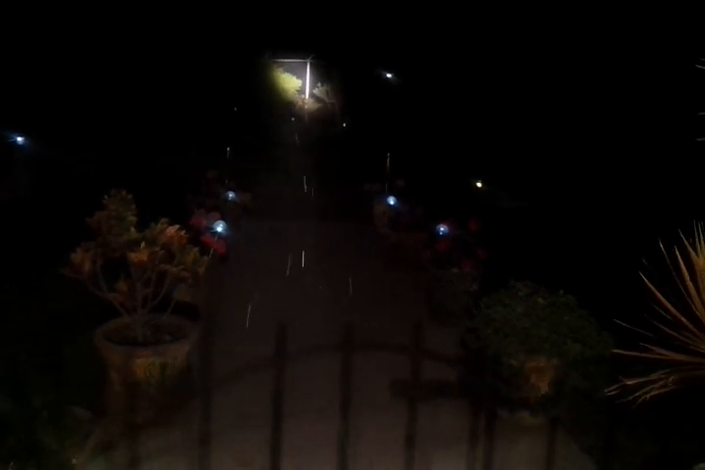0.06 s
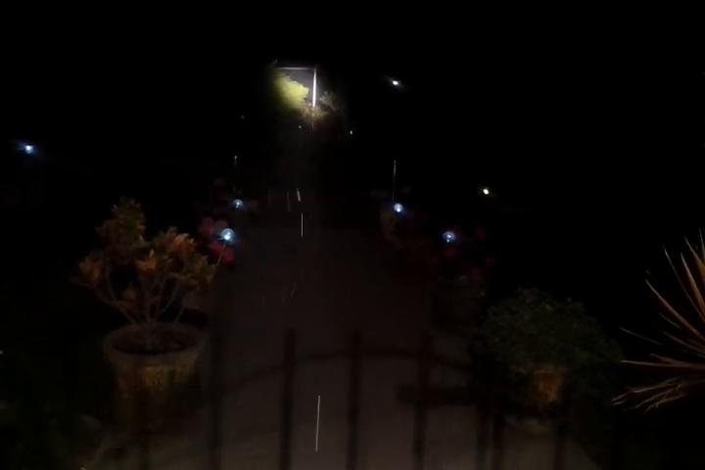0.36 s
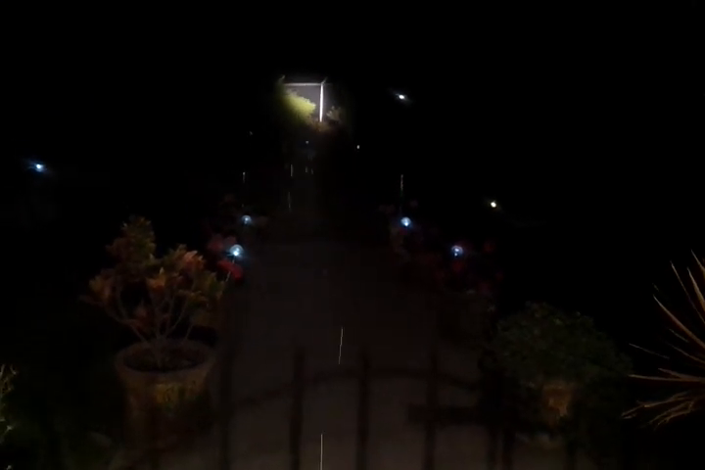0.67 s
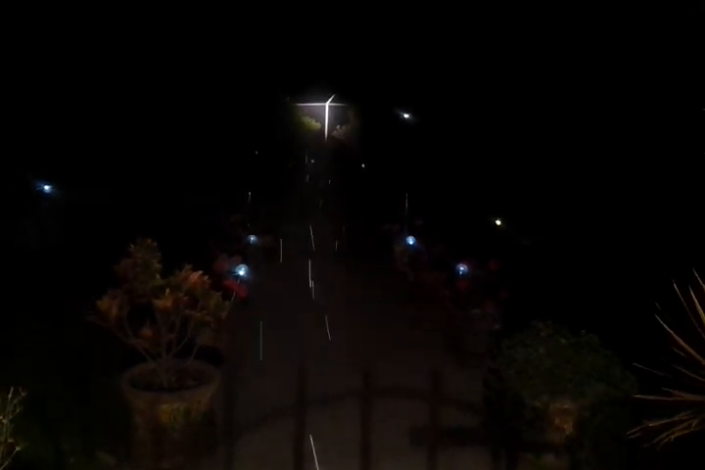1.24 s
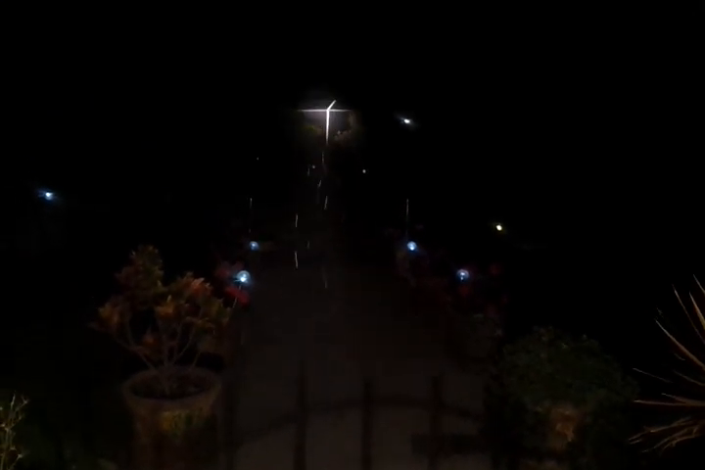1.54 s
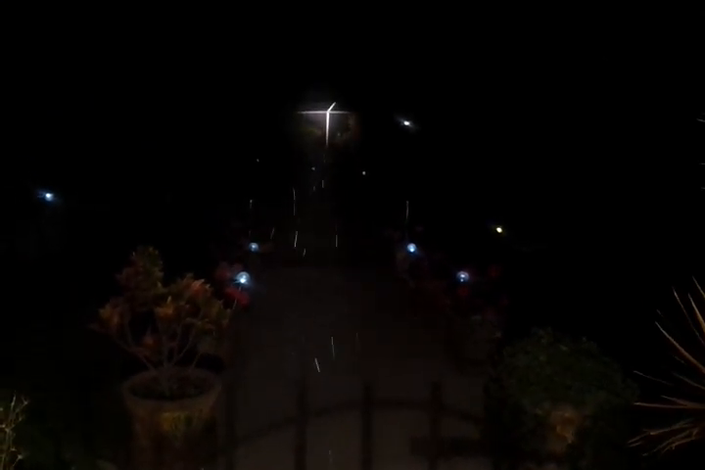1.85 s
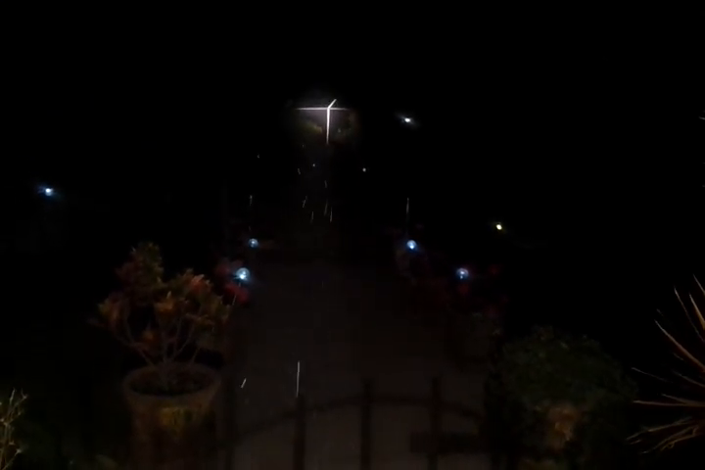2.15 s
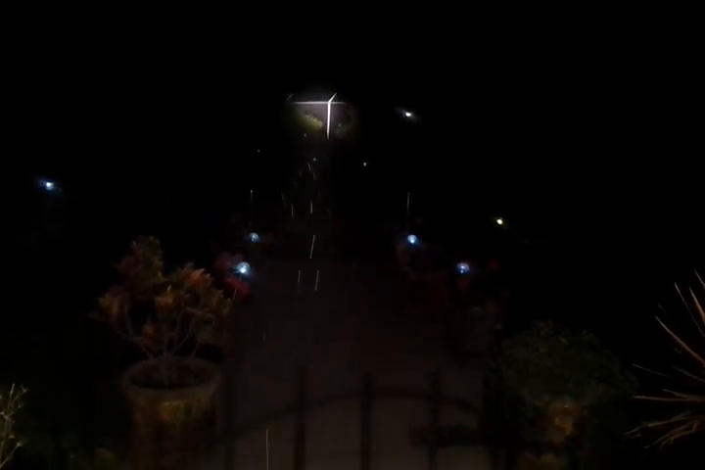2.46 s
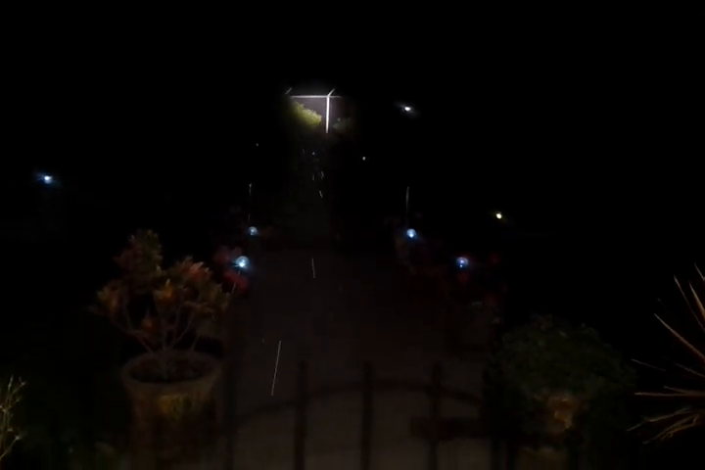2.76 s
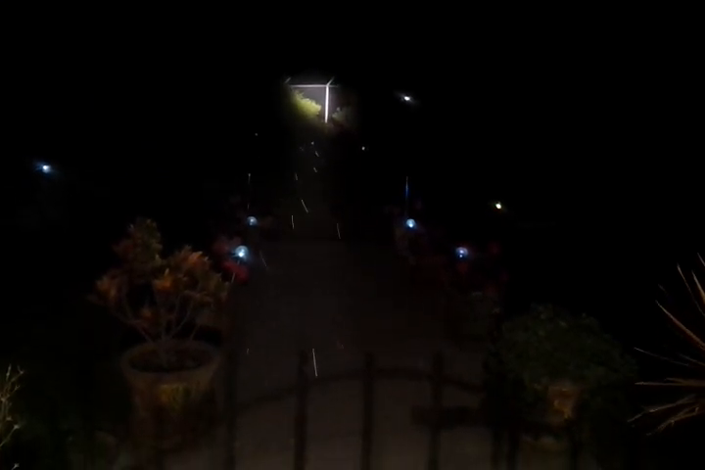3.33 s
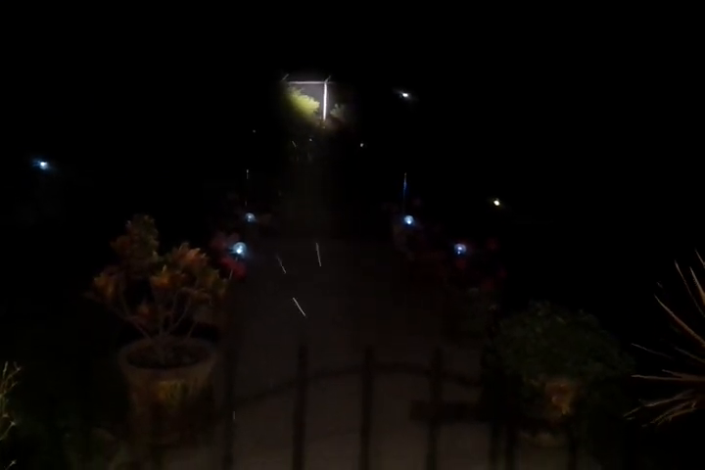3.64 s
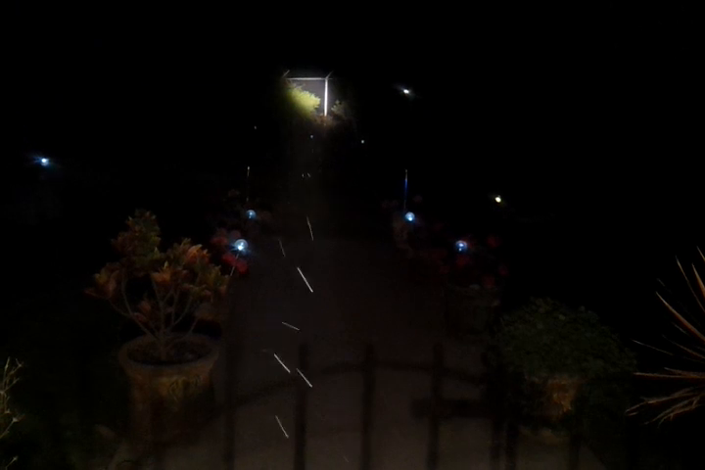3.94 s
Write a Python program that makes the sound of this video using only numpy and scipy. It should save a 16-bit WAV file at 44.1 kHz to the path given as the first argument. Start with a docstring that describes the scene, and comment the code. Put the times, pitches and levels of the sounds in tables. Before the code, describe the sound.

A cricket chirps quietly and regularly outdoors at night, while handling rumble, soft bumps and brief brushes sound close on the microphone. Light drizzle and a far town hum continue behind, with distant traffic rising faintly near the end.

```python
"""Cricket in a drizzly night garden

A cricket chirps by stridulation, its wing strokes smeared by the garden's echoes. A hand on the
camera that holds the microphone makes a low rumble, soft thumps and a few brushing rustles.
Far traffic swells once with a faint whine, over fine drizzle, steady hiss and the hum of a town."""
import sys
import numpy as np
from scipy import signal
from scipy.fft import rfft, irfft, next_fast_len
from scipy.io import wavfile
from scipy.ndimage import map_coordinates

SR = 44100
rng = np.random.default_rng(int(sys.argv[2]) if len(sys.argv) > 2 else 0)


def store_wav(level_fs):
    """Save 16-bit WAV to argv[1]."""
    pcm = np.round(np.clip(np.atleast_2d(level_fs), -1, 1) * 32767)
    wavfile.write(sys.argv[1], SR, pcm.T.astype(np.int16))


N = 176400


def amp(db):
    """Amplitude ratio of a level in decibels."""
    return 10 ** (np.asarray(db) / 20)


def unit(x):
    """Normalisation to rms 1."""
    return x / np.sqrt(np.mean(x ** 2) + 1e-20)


def curve(rows):
    """Linear interpolation of (time [s], value) points at every sample."""
    return np.interp(np.arange(N) / SR, *np.transpose(rows))


def wobble(rate):
    """Smooth fluctuation: a spline through `rate` random values a second."""
    return map_coordinates(rng.standard_normal(int(N * rate / SR) + 4), [np.arange(N) * rate / SR])


def filtered(x, response):
    """Linear filtering: the spectrum of x is multiplied by a frequency response."""
    size = next_fast_len(N + SR // 2)
    return irfft(rfft(x, size) * response(np.fft.rfftfreq(size, 1 / SR)), size)[:N]


def noise(response):
    """White noise shaped by a frequency response, at rms 1."""
    return unit(filtered(rng.standard_normal(N), response))


def coloured(points):
    """Broadband noise of rms 1 whose spectrum follows (frequency [Hz], relative level [dB]) points."""
    hz, db = np.transpose(points)
    return noise(lambda f: amp(np.interp(np.log(f + 1), np.log(hz + 1), db)))


def narrow(hz, width):
    """Narrow-band noise of rms 1, heard as a fuzzy tone."""
    return noise(lambda f: 1 / (1 + ((f - hz) / width * 2) ** 2))


def add(out, start_s, x):
    """Superposition of x on out from a starting time."""
    i = max(round(start_s * SR), 0)
    out[i:i + len(x)] += x[:max(N - i, 0)]


def cricket():
    """Stridulation: each wing stroke is a falling tone, made raspy by the file's unevenly caught teeth."""
    # (time [s], level [dB], starting pitch [Hz], wing strokes [count], fall within a stroke [Hz])
    chirps = [(0.268, -61.5, 3990, 4, 280), (0.842, -60.5, 4024, 5, 190), (1.538, -62, 3990, 4, 332),
              (2.075, -61.5, 4015, 4, 280), (2.746, -60.3, 4025, 4, 320), (3.420, -61.5, 3967, 4, 300)]
    period_s, stroke_s, tooth_hold_s = 0.030, 0.023, 0.00201
    rise_hz, scatter_hz = 14, 52
    loudest_share, taper_db = 0.28, 1.4  # a chirp peaks at this share of its strokes
    garden_t60_s, echo_db = 0.32, 2
    t = np.arange(int(stroke_s * SR)) / SR
    progress = t / stroke_s
    echo_t = np.arange(SR // 3) / SR
    echo_decay = amp(-60 * echo_t / garden_t60_s)
    out = np.zeros(N)
    for start, db, hz, strokes, fall_hz in chirps:
        for k in range(int(round(strokes))):
            rasp = map_coordinates(rng.standard_normal(32), [t / tooth_hold_s])
            pitch = hz + rise_hz * (k - 1) - fall_hz * progress ** 2 + scatter_hz * (rasp - rasp.mean())
            envelope = np.abs(np.sin(np.pi * progress)) ** 0.5
            stroke = envelope * np.sin(2 * np.pi * np.cumsum(pitch) / SR)
            heard = signal.fftconvolve(stroke, rng.standard_normal(len(echo_t)) * echo_decay)
            heard *= amp(echo_db) * np.linalg.norm(stroke) / np.linalg.norm(heard)
            heard[:len(t)] += stroke  # the direct sound joins its reverberation
            heard *= np.sqrt(period_s * SR) / np.linalg.norm(heard)  # energy of one period at rms 1
            stroke_db = db - taper_db * (k - loudest_share * strokes) ** 2
            add(out, start + k * period_s, amp(stroke_db) * heard)
    return out


def grip_rumble():
    """Structure-borne sound: the hand's uneven grip reaches the microphone as low noise."""
    # strength of the rumble (time [s], level [dB])
    grip = [(0, -42), (0.3, -42), (0.48, -42.5), (0.56, -47.5), (0.95, -46.5), (1.12, -49), (1.28, -53),
            (1.39, -54), (1.47, -48), (1.69, -45.5), (1.77, -53), (2.12, -45.5), (2.27, -51), (2.42, -46),
            (2.68, -54.5), (3.05, -47), (3.35, -49.5), (3.7, -52), (4, -58)]
    # its spectrum (frequency [Hz], relative level [dB])
    spectrum = [(8, -33), (20, 7.5), (36, 6), (55, 3.5), (82, -1), (120, -9.5), (190, -23), (260, -24.5),
                (500, -51), (1500, -91)]
    uneven_db = 2 * wobble(18)
    return amp(curve(grip)) * unit(amp(uneven_db) * coloured(spectrum))


def case_thumps():
    """Soft impact: the hand pushes the case once and lets it spring back, giving a two-lobed pulse. The first
    pulse, at the very start, is a brief click of the same shape rather than a push of the hand."""
    # (time [s], peak level [dB], pitch [Hz]); the first row is a brief click at the very start
    thumps = [(0.017, -38, 102), (0.105, -33, 58), (0.174, -40, 62), (0.202, -35, 66), (0.282, -34, 67),
              (0.35, -38, 62), (0.398, -39, 62), (0.471, -31, 54.5), (0.658, -30, 51.4),
              (0.862, -39.5, 71.6), (0.994, -38.5, 61), (1.078, -42, 53.5), (1.396, -41.5, 42),
              (1.51, -34.5, 77), (1.531, -36, 61), (1.59, -43, 82.4), (1.644, -32, 44.3),
              (1.665, -33, 44.7), (1.719, -42.5, 50), (1.78, -43.5, 215), (2.115, -39, 61.4),
              (2.16, -45, 85), (2.374, -40, 45.5), (2.428, -42, 58.6), (2.497, -40.5, 71), (3.031, -36, 43),
              (3.09, -42.5, 62), (3.255, -41.5, 55), (3.309, -36, 53), (3.328, -33, 51), (3.512, -32, 59.6),
              (3.581, -42.5, 80.4), (3.608, -35.5, 73.4), (3.659, -30.5, 78), (3.82, -45, 88)]
    softness = 3.47
    t, out = np.arange(N) / SR, np.zeros(N)
    for centre, db, hz in thumps:
        scaled_time = np.pi * hz * (t - centre)
        push = -scaled_time / (1 + scaled_time ** 2) ** softness
        out += amp(db) * push / np.abs(push).max()
    return out


def rustles():
    """Friction noise: each light brush is a grainy swell coloured by the same few resonances."""
    # (time [s], level [dB]) aside, a brush is a band of noise; its columns are
    # (centre time [s], half length [s], level [dB], centre [Hz], width [octaves], resonance depth [ratio])
    brushes = [(0.09, 0.034, -67, 6500, .12, .8), (0.156, 0.022, -62, 3650, 0.2, .2),
               (0.438, 0.02, -66, 3000, .15, 1), (0.462, 0.024, -61, 5500, 0.19, 1.9),
               (0.948, 0.027, -62, 3800, .6, .6), (2.087, 0.02, -58, 6700, 0.36, 1.2),
               (2.172, 0.019, -51, 7350, 0.51, 1.1), (2.229, 0.037, -61.5, 7000, 0.27, 1),
               (3.572, 0.027, -59, 6750, 0.32, 0.8), (3.603, 0.078, -60.5, 2800, 1, .5)]
    # (frequency [Hz], width [Hz], gain at depth 1 [dB])
    resonances = [(3030, 670, 7), (5440, 440, 3.5), (6780, 540, 6), (7300, 420, 5), (8550, 300, 1.5),
                  (9680, 490, 4.5)]
    grain_db, grains_per_s = 2.5, 220

    def body(f):
        return amp(sum(db / (1 + (2 * (f - hz) / width) ** 2) for hz, width, db in resonances))

    t, out = np.arange(N) / SR, np.zeros(N)
    for centre, half, db, hz, octaves, depth in brushes:
        rolloff = lambda f: np.sqrt(1 + np.abs(np.log2((f + 1) / hz) / octaves) ** 3)
        friction = noise(lambda f: body(f) ** depth / rolloff(f))
        grain = amp(grain_db * np.tanh(wobble(grains_per_s)))
        swell = np.exp(-0.5 * ((t - centre) / half) ** 2)
        out += amp(db) * swell * unit(friction * grain)
    return out


def traffic():
    """Rolling noise: far tyres roar in one swell; their main whine and an engine drone vary separately."""
    # swell of the roar (time [s], level [dB])
    roar_level = [(0, -90), (1.2, -79), (2.0, -76), (2.35, -66.5), (2.75, -62.8), (3.05, -64), (3.29, -67),
                  (3.45, -75), (4, -76)]
    # spectrum of the tyres (frequency [Hz], relative level [dB])
    tyres = [(250, -37), (450, -5), (560, 6), (700, 5), (745, 0), (800, 7), (950, 7), (1150, -1.5),
             (1600, -7.5), (3000, -53)]
    # weaker whines within the roar (frequency [Hz], width [Hz], relative level [dB])
    weak_whines = [(697, 25, -5), (503, 22, -11)]
    # main tyre whine (time [s], level [dB])
    whine_level = [(0, -78), (1.0, -77), (1.8, -73.5), (2.3, -74), (2.75, -64), (3.05, -71), (3.27, -64.5),
                   (3.38, -75), (4, -74)]
    # engine drone (time [s], level [dB])
    drone_level = [(0, -82), (0.9, -75.5), (1.25, -70), (1.75, -70), (2.1, -75.5), (4, -85)]
    roar = coloured(tyres) + sum(amp(db) * narrow(hz, width) for hz, width, db in weak_whines)
    whine = amp(curve(whine_level)) * narrow(hz=870.6, width=25)
    drone = amp(curve(drone_level)) * narrow(hz=294, width=32)
    return amp(curve(roar_level)) * roar + whine + drone


def drizzle():
    """Shot noise: droplets land at random times, each ticking as a damped sinusoid."""
    drops_per_s, level_db, centre_hz, ring_cycles = 300, -74.5, 4950, 3.4
    draws = rng.random((int(drops_per_s * N / SR), 3))
    arrival, pitch, size = np.hsplit(draws, 3)
    t = np.arange(SR // 200) / SR
    hz = centre_hz * 2 ** (2 * pitch - 1)  # up to an octave either side
    strength = -np.log(1 - size)  # exponentially distributed
    ticks = strength * np.sin(2 * np.pi * hz * t) * np.exp(-2 * hz * t / ring_cycles)
    places = (arrival * N).astype(int) + np.arange(len(t))
    return amp(level_db) * unit(np.bincount(places.ravel(), ticks.ravel(), N)[:N])


def hiss():
    """Broadband noise: drizzle and the microphone's self-noise merge into a nearly steady hiss."""
    # (time [s], level [dB])
    level = [(0, -58), (0.8, -58), (1.2, -59), (2.0, -58), (2.8, -58.5), (3.3, -58.5), (4, -58.5)]
    # (frequency [Hz], relative level [dB])
    spectrum = [(200, -0.5), (900, 1), (1600, -1.6), (2500, 0.2), (3500, -0.1), (5000, -0.2), (6700, 0.14),
                (8500, -1.5), (11700, -3)]
    return amp(curve(level)) * coloured(spectrum)


def town_hum():
    """Ambient noise: the far town is a hum with little treble, wavering slightly in level."""
    # (frequency [Hz], relative level [dB])
    spectrum = [(60, -1.5), (200, -0.5), (300, 0.5), (390, -1), (570, 1.5), (780, -1), (950, -1.5),
                (1400, -6), (2200, -9.5), (4000, -39)]
    level_db = -61.5 + 0.6 * wobble(4.69)
    return amp(level_db) * coloured(spectrum)


def wash():
    """Amplitude-modulated noise: a faint upper-middle band fades early and returns near the end."""
    # (time [s], level [dB])
    level = [(0, -66.5), (1, -84.5), (3.3, -71.5), (3.6, -66.5), (4, -66.5)]
    # (frequency [Hz], relative level [dB])
    spectrum = [(600, -38), (1100, 1), (1600, 1.5), (2300, -4.5), (3200, -6), (6000, -31)]
    return amp(curve(level)) * coloured(spectrum)


def scene():
    """Superposition: all sources sum at one microphone, alike in both channels."""
    background = hiss() + town_hum() + wash() + traffic()
    handling = grip_rumble() + case_thumps() + rustles()
    mono = background + handling + cricket() + drizzle()
    return np.array([mono, mono])


def record(dry):
    """Ideal low-pass filtering: the camera keeps nothing above its band limit."""
    limit_hz = 11850
    return np.array([filtered(channel, lambda f: f < limit_hz) for channel in dry])


dry = scene()
out = record(dry)
store_wav(out)
```